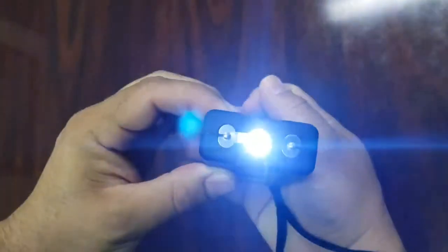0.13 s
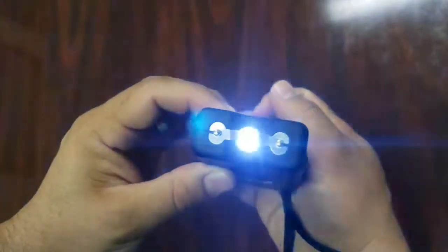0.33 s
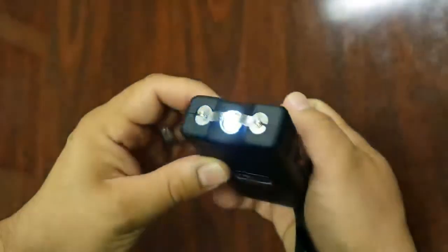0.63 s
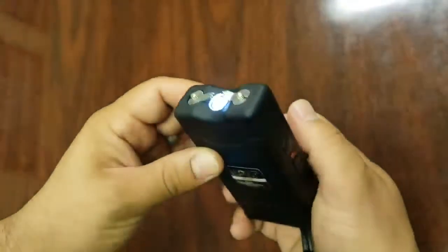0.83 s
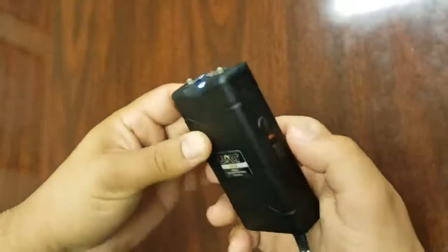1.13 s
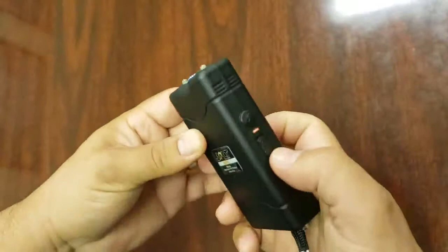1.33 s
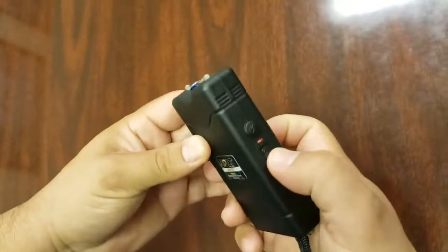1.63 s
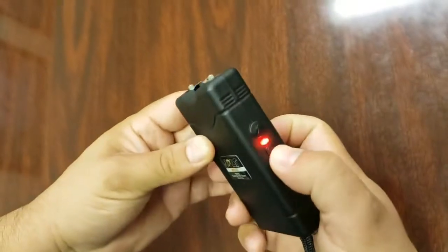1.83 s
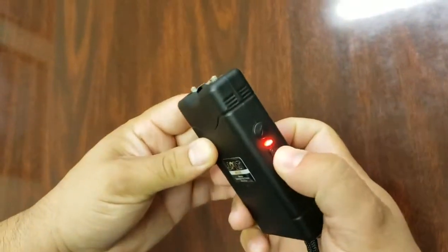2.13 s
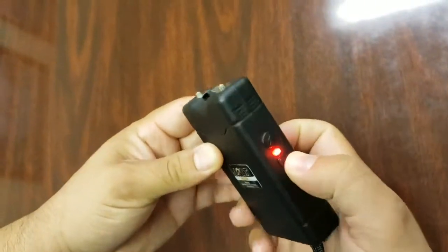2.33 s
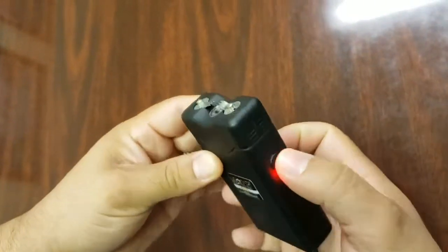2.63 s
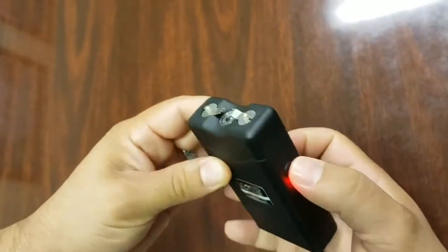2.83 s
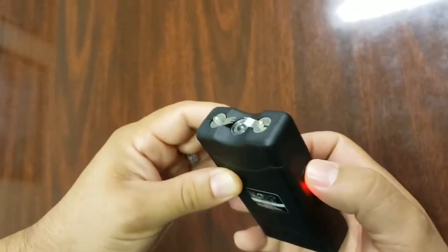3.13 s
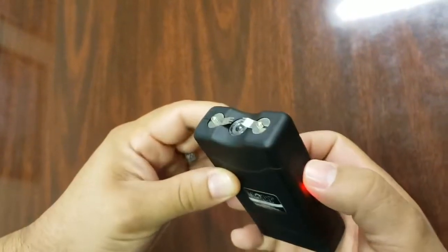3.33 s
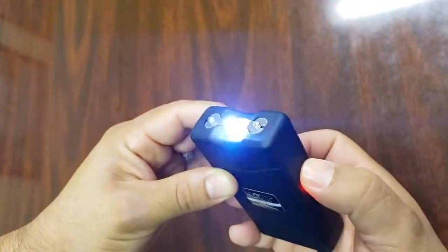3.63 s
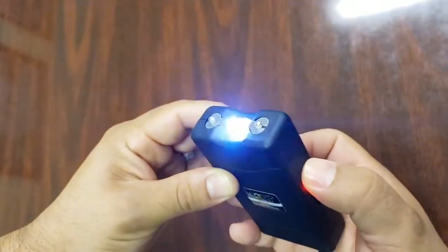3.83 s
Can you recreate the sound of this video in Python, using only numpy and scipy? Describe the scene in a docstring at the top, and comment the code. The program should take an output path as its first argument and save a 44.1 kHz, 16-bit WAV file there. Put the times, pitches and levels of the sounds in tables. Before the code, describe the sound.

A stun device bursts into loud harsh electric crackling after quiet handling ticks in a room

```python
"""A hand-held stun device close to a phone in a quiet room.
Throughout: shaped-noise rumble and hiss, a wavering appliance hum and a low throb that comes and goes.
From 1.2 s: fingers tick on the plastic case and its switch (noise through case modes), with one thin dry pop.
From 3.6 s: sparks about fifty times a second. Each throws the left microphone into one slow swing
(a slowing cosine) and is a sharp crack of noise with echoes and wash from the room."""
import sys
import numpy as np
from scipy import signal
from scipy.fft import rfft, irfft
from scipy.io import wavfile
from scipy.ndimage import uniform_filter1d

SR = 44100
rng = np.random.default_rng(int(sys.argv[2]) if len(sys.argv) > 2 else 0)


def wav_out(sig):
    """Save sig, one row per channel (or a flat mono array), as 16-bit PCM at SR to the path in sys.argv[1]."""
    wavfile.write(sys.argv[1], SR, np.round(np.clip(np.atleast_2d(sig).T, -1, 1) * 32767).astype(np.int16))


def boost_factor(decibels):
    """Convert a level in decibels to a linear amplitude factor."""
    exponent = np.asarray(decibels, float) / 20
    return 10 ** exponent


N = 176400
T = np.arange(N) / SR
F = np.maximum(np.arange(N // 2 + 1) * SR / N, 1)
NOISE_TOP_HZ = 13100  # top of air, ticks and room sound
WANDER_HZ = 7


def curve(table, hz, axis):
    """One column of a table on a log-frequency axis."""
    rows = np.array(table)
    return np.interp(np.log(hz), np.log(rows[:, 0]), rows[:, axis])


def fade(t, t60_s):
    """Exponential decay from t = 0, silent before."""
    return (t >= 0) * np.exp(-np.log(1000) * np.maximum(t, 0) / t60_s)


def add(out, x, start_s):
    """Mix x into out from start_s on."""
    i = int(start_s * SR)
    out[..., i:i + x.shape[-1]] += x[..., :max(N - i, 0)]


def narrow(hz, width_hz):
    """Noise in a narrow band, rms 1."""
    x = irfft(rfft(rng.standard_normal(N)) / (1 + ((F - hz) / width_hz * 2) ** 2), N)
    return x / x.std()


# rumble and hiss spectrum: freq_hz, left_density_rel_db, right_density_rel_db, likeness_0_to_1
AIR_SPECTRUM = [(18.5, -71, -78, 0.8), (40.3, -66.5, -72, 1), (106, -64.5, -67.5, 0.8), (193, -69, -70, 1),
                (251.7, -67, -69.5, 0.99), (344.7, -80.5, -84, 0.6), (466, -91.5, -95, 0.6),
                (1110, -100, -102, 0.22), (2420, -101, -101, 0.1), (3170, -106, -106, 0.04),
                (5830, -110, -112, 0.1), (6500, -102, -114, 0), (7820, -116, -119, 0.02),
                (11650, -103, -102, 0.09)]
AIR_GAIN_DB, FLICKER_DB, FLICKER_PER_S = -13.5, 1.5, 6.19


def air():
    """Rumble and hiss of room and microphones: alike in the lows, apart in the highs; levels flicker slightly."""
    a, b = rfft(rng.standard_normal((2, N)))
    like = np.clip(curve(AIR_SPECTRUM, F, axis=3), 0, 1)
    left = a * boost_factor(curve(AIR_SPECTRUM, F, axis=1))
    right = (like * a + np.sqrt(1 - like ** 2) * b) * boost_factor(curve(AIR_SPECTRUM, F, axis=2))
    noise = irfft(np.array([left, right]) * (F < NOISE_TOP_HZ), N) * np.sqrt(SR / 2)
    steps = rng.standard_normal((2, 40))
    flicker = np.array([np.interp(T * FLICKER_PER_S, np.arange(len(k)), k) for k in steps])
    return noise * boost_factor(AIR_GAIN_DB + FLICKER_DB * flicker)


# appliance hum lines: freq_hz, phase_wander_rad, level_wander_db, left_db, right_db
HUM_LINES = [(120.7, 0.4, 1.54, -52.5, -59), (230.7, 1.22, 2, -57.5, -61.5)]


def hum():
    """Appliance lines: sines with randomly wandering phase and level."""
    out = np.zeros((2, N))
    for freq_hz, wander_rad, wander_db, left_db, right_db in HUM_LINES:
        phase = 2 * np.pi * freq_hz * T + wander_rad * narrow(0, WANDER_HZ)
        line = np.sqrt(2) * np.sin(phase) * boost_factor(wander_db * narrow(0, WANDER_HZ))
        out += boost_factor(np.array([[left_db], [right_db]])) * line
    return out


# mid level of the low throb: time_s, level_db
THROB_LEVEL = [(0, -50.5), (.3, -61), (.6, -51.5), (.8, -63), (1.15, -50), (1.45, -65), (2.55, -64.5)]
THROB_HZ, THROB_WIDTH_HZ, THROB_WANDER_RAD = 76.5, 4, 1.1


def throb():
    """Low sine with wandering phase and a level that comes and goes, stronger on the left."""
    phase = 2 * np.pi * THROB_HZ * T + THROB_WANDER_RAD * narrow(0, THROB_WIDTH_HZ)
    level = boost_factor(np.interp(T, *np.array(THROB_LEVEL).T))
    return level * np.sqrt(2) * np.sin(phase) * boost_factor(np.array([[1.5], [-1.5]]))


# colour of the two microphone ports: freq_hz, left_rel_db, right_rel_db
PORT_COLOUR = [(97, -23.5, -22), (804, -8, -21.5), (1480, -29, -23.5), (2390, -11, -11.5),
               (3270, -18.5, -14.5), (3910, -15.5, -6.5), (5530, -13, -11.5), (6720, -6, -22),
               (6980, -2, -26), (8540, -24.5, -33), (10340, -6.5, 1), (11100, -6.5, -3), (12710, -9.5, -10),
               (14040, -41, -19.5), (18200, -107, -71)]


def port(x, axis):
    """Causal minimum-phase filter with the colour of one port, unit energy."""
    size = 1024
    hz = np.maximum(np.arange(size // 2 + 1) * SR / size, 1)
    ceps = irfft(np.log(boost_factor(curve(PORT_COLOUR, hz, axis=axis))))
    ceps[1:size // 2] *= 2  # fold the cepstrum onto positive time
    ceps[size // 2 + 1:] = 0
    taps = irfft(np.exp(rfft(ceps)))
    return signal.fftconvolve(x, taps / np.linalg.norm(taps))[:len(x)]


# finger and switch ticks: start_s, level_rel_db, centre_hz, room_rel_db, left_minus_right_db
TICKS = [(1.2349, -62, 6500, -17, 14.5), (1.5265, -62, 1490, -12, 7), (1.8973, -57, 3000, -16.5, -3),
         (2.3977, -65.5, 5000, -10.5, 10), (3.096, -66, 6050, -12.5, 9), (3.146, -62, 8200, -21, 16.5),
         (3.248, -71, 2200, -28, 22), (3.6284, -46, 1480, -24, 13.5)]
# modes of the plastic case: freq_hz, level_rel_db
CASE_MODES = [(1300, 0), (2200, -1), (3500, -4), (4500, 1.5), (6450, 2.5), (11800, 1)]
CASE_WIDTH_HZ = 500
TICK_T60_S, TICK_ROOM_T60_S, TICK_WIDTH_OCTAVES = 0.015, 0.22, 1.28


def ticks():
    """Short noise scrapes ring the modes of the case and leave a faint room tail."""
    out, t = np.zeros((2, N)), T[:SR // 4]
    hz = np.maximum(np.arange(len(t) // 2 + 1) * SR / len(t), 1)
    modes = sum(boost_factor(db) / (1 + 2j * (hz - f) / CASE_WIDTH_HZ) for f, db in CASE_MODES)
    for start_s, level_db, centre_hz, room_db, pan_db in TICKS:
        scrape, *tail = rng.standard_normal((3, len(t)))
        ring = irfft(rfft(fade(t - .002, TICK_T60_S) * scrape) * modes, len(t))
        x = ring + boost_factor(room_db) * fade(t - .006, TICK_ROOM_T60_S) * np.array(tail)
        band = np.exp(-.5 * (np.log2(hz / centre_hz) / TICK_WIDTH_OCTAVES) ** 2)
        band /= np.sqrt(np.mean(band ** 2))
        x = irfft(rfft(x) * (hz < NOISE_TOP_HZ) * band, len(t))
        add(out, boost_factor(level_db + np.array([[pan_db], [-pan_db]]) / 2) * x, start_s - .002)
    return np.array([out[c] / 2 + port(out[c], axis=1 + c) for c in range(2)])  # half plain, plus port


POP_S, POP_DB, POP_FADE_S = 1.4228, -52, .0002


def pop():
    """One thin dry pop: an abrupt step with exponential decay, equal on both sides."""
    return boost_factor(POP_DB) * (T >= POP_S) * np.exp(-np.abs(T - POP_S) / POP_FADE_S)


# sparks, also played by sparks(): start_s, crack_rel_db, swing_rel_db
SPARKS = [(3.6461, -8, -8.5), (3.6673, -6, -2.5), (3.6889, -6, -11.5), (3.7074, -6.5, -12),
          (3.729, -7, -9.5), (3.7524, -6.5, -11), (3.7716, -7.5, -13.5), (3.791, -6.5, -11),
          (3.8115, -8.5, -11.5), (3.8330, -7.5, -15), (3.853, -9, -12.5), (3.869, -9.5, -18.5),
          (3.888, -7, -13.5), (3.9067, -7.5, -10), (3.9256, -7.5, -16.5), (3.9462, -7, -14),
          (3.9648, -12, -13), (3.9869, -7, -10.5)]
# smear ahead of the first spark
PRE_ECHO_S, PRE_ECHO_HZ, PRE_ECHO_WIDTH_S, PRE_ECHO_DB = 3.6436, 322, 0.00085, -14
SWING_HZ, SWING_SAG_S, SWING_FADE_S, SWING_EDGE_HZ = 122.5, 0.016, 0.019, 1300
SWING_RIGHT_DB, SWING_RIGHT_LAG_S, SWING_RIGHT_DIP = -34, 0.0011, 0.53


def swings():
    """Overdriven left microphone jumps, then swings, slowing as it settles; the right barely follows."""
    left, t = np.zeros(N), T[:SR // 10]
    cycles = SWING_HZ * SWING_SAG_S * (1 - np.exp(-t / SWING_SAG_S))
    swing = np.cos(2 * np.pi * cycles) * np.exp(-(t / SWING_FADE_S) ** 4)
    for start_s, _, swing_db in SPARKS:
        add(left, boost_factor(swing_db) * swing, start_s)
    left = signal.sosfilt(signal.butter(2, SWING_EDGE_HZ, fs=SR, output="sos"), left)
    since_s = T - PRE_ECHO_S
    smear = np.cos(2 * np.pi * PRE_ECHO_HZ * since_s) * np.exp(-(since_s / PRE_ECHO_WIDTH_S) ** 2)
    left += boost_factor(PRE_ECHO_DB) * smear
    late = uniform_filter1d(np.interp(T - SWING_RIGHT_LAG_S, T, left), size=60)
    return np.array([left, boost_factor(SWING_RIGHT_DB) * (late - SWING_RIGHT_DIP * left)])


PATCHY_DB, CRACK_PATCHY_DB, HOLE_DB = 6, 4, -25


def patchy(x, depth_db, hole_db):
    """Bands of about 1.4 kHz flicker in level every 6 ms; the weakest drop by a further hole_db."""
    _, _, z = signal.stft(x, nperseg=128)
    steps = rng.standard_normal((2, z.shape[1] // 4 + 1, z.shape[2] // 4 + 1))
    patch_db = depth_db * np.minimum(steps, 1) + hole_db * (steps < -.6)
    db = np.kron(patch_db, np.ones((4, 4)))[:, :z.shape[1], :z.shape[2]]
    return signal.istft(z * boost_factor(db), nperseg=128)[1][:, :N]


# echoes of a spark: delay_s, left_rel_db, right_rel_db
ECHOES = [(.0084, -9, -12), (.0140, -13, -20)]
RIGHT_LAG_S, RIGHT_DB = .00025, -2.5
CRACK_T60_S, CRACK_HOLD_S, CRACK_RISE_T60_S = (.005, .006), (.0011, .0004), (.0015, .004)  # left, right
CRACK_SAME, ECHO_SCATTER_DB = 0.57, 6.5  # weight of the fine detail that every spark repeats
WASH_START_S, WASH_RISE_S, WASH_T60_S, WASH_DB = 0.006, 0.0015, 0.052, (-6.5, -20)
ROOM_LOW_HZ = 2200


def sparks():
    """Crack, single echoes and a diffuse wash of noise for every spark, heard through each port."""
    out, room, lead_s = np.zeros((2, N)), np.zeros((2, N)), .003
    t = T[:SR // 10] - lead_s
    same = rng.standard_normal(len(t))
    for start_s, crack_db, _ in SPARKS:
        sides = rng.standard_normal((2, len(t)))
        shared = rng.standard_normal(len(t))
        scatter = rng.standard_normal((2, len(ECHOES)))
        for c in range(2):
            rise = fade(-t, CRACK_RISE_T60_S[c]) + (t > 0)
            fall = fade(t - CRACK_HOLD_S[c], CRACK_T60_S[c])
            crack = np.where(t < CRACK_HOLD_S[c], rise, fall)
            echo = sum(boost_factor(e[1 + c] + ECHO_SCATTER_DB * np.tanh(k)) * fade(t - e[0], CRACK_T60_S[c])
                       for e, k in zip(ECHOES, scatter[c]))
            wash_rise = np.clip((t - WASH_START_S) / WASH_RISE_S, 0, 1)
            wash = boost_factor(WASH_DB[c]) * wash_rise * fade(t, WASH_T60_S)
            fresh = shared + sides[c] / 2
            grain = np.tanh(CRACK_SAME * same + np.sqrt(1 - CRACK_SAME ** 2) * fresh)
            level = boost_factor(crack_db + c * RIGHT_DB)
            begin_s = start_s - lead_s + c * RIGHT_LAG_S
            add(out[c], level * crack * grain, begin_s)
            add(room[c], level * (echo * grain + wash * sides[c] / 2), begin_s)
    room_band = signal.butter(5, (ROOM_LOW_HZ, NOISE_TOP_HZ), "band", fs=SR, output="sos")
    out = patchy(out, CRACK_PATCHY_DB, 0) + signal.sosfilt(room_band, patchy(room, PATCHY_DB, HOLE_DB))
    return np.array([port(out[c], axis=1 + c) for c in range(2)])


def scene():
    """All sources at the two ports."""
    return air() + hum() + throb() + ticks() + pop() + swings() + sparks()


DUCK_LAG_S, DUCK_HOLD_S, DUCK_DB, DUCK_LOW_SHARE = 0.0021, 0.0062, -19, 0.31
KNEE, TOP_HZ = 0.62, 15200


def low_pass(x):
    """Removes everything above the highest recorded frequency."""
    return signal.sosfilt(signal.butter(12, 16490, fs=SR, output="sos"), x)


def record(dry):
    """Gain control lags each crack, ducking treble hard and bass a little; peaks are rounded, top cut."""
    low = signal.sosfiltfilt(signal.butter(2, 600, fs=SR, output="sos"), dry)
    high = dry - low
    power = uniform_filter1d(np.mean(high ** 2, axis=0), int(DUCK_HOLD_S * SR))
    heard = np.interp(T - DUCK_LAG_S - DUCK_HOLD_S / 2, T, power)
    gain = 1 / (1 + (heard / boost_factor(DUCK_DB) ** 2) ** 2)
    ducked = high * gain + low * gain ** DUCK_LOW_SHARE
    rounded = ducked / (1 + (ducked / KNEE) ** 4) ** 0.16
    mix = signal.sosfilt(signal.butter(6, TOP_HZ, fs=SR, output="sos"), rounded)
    return low_pass(mix)


dry = scene()
out = record(dry)
wav_out(out)
```